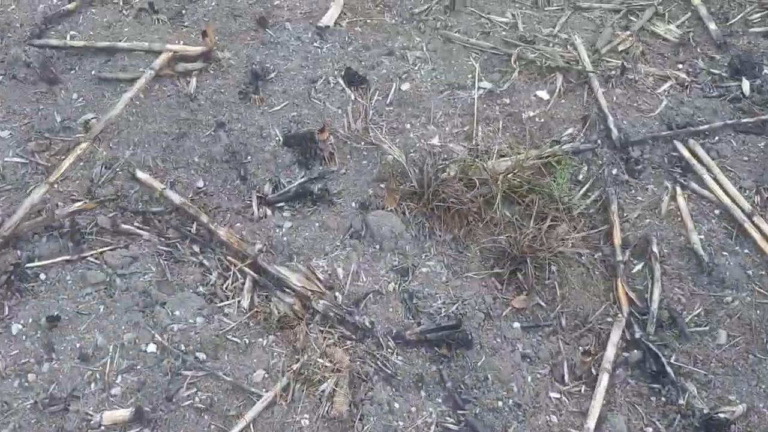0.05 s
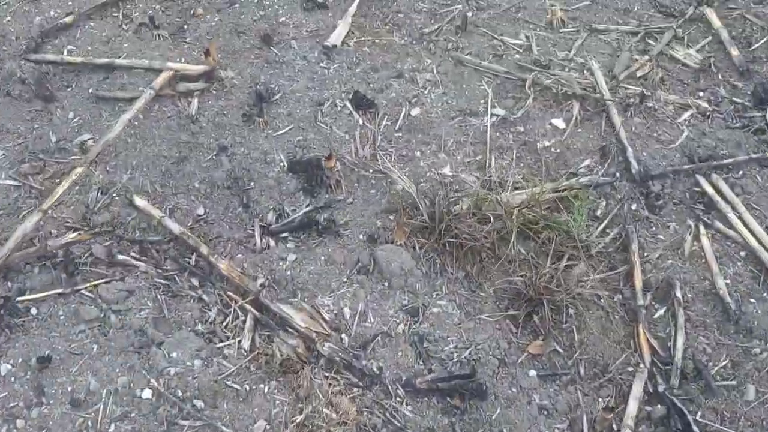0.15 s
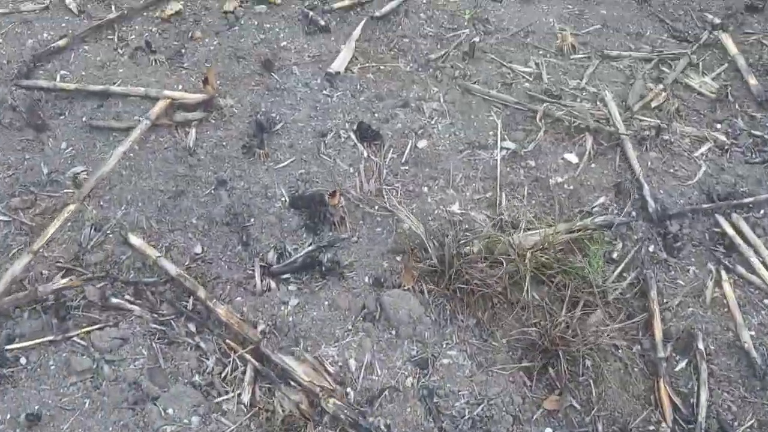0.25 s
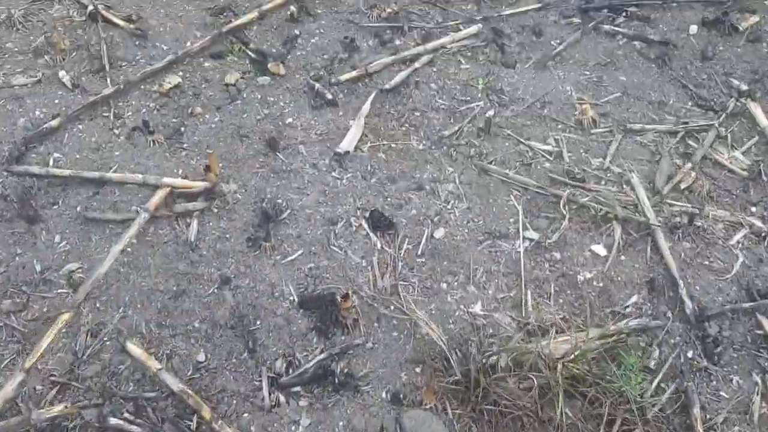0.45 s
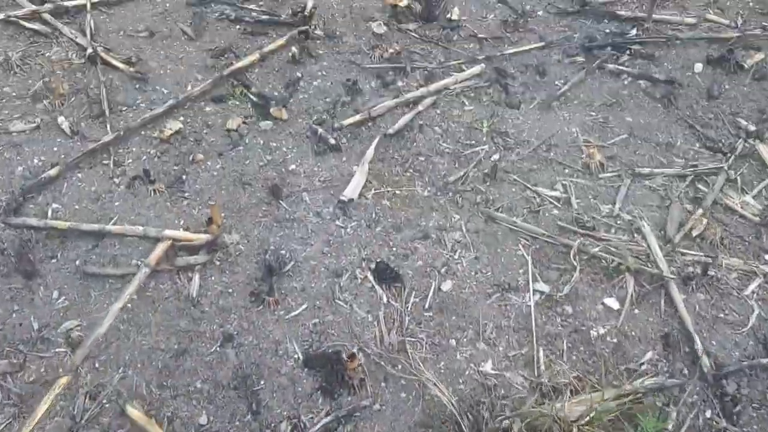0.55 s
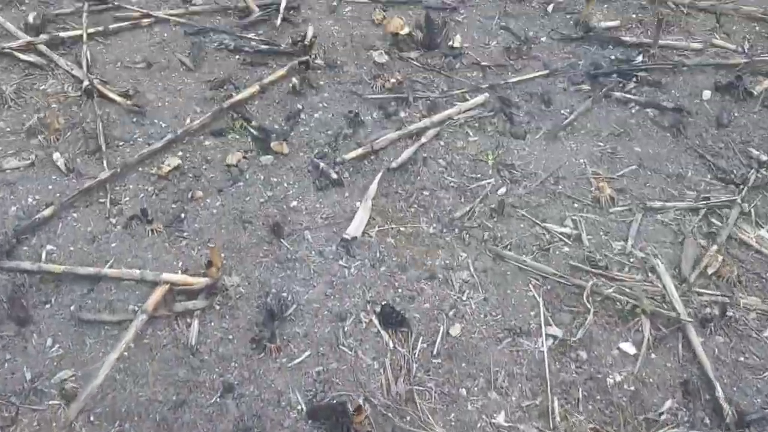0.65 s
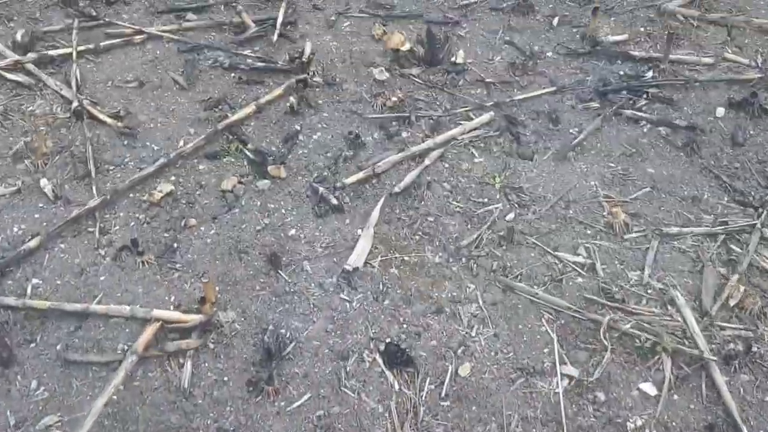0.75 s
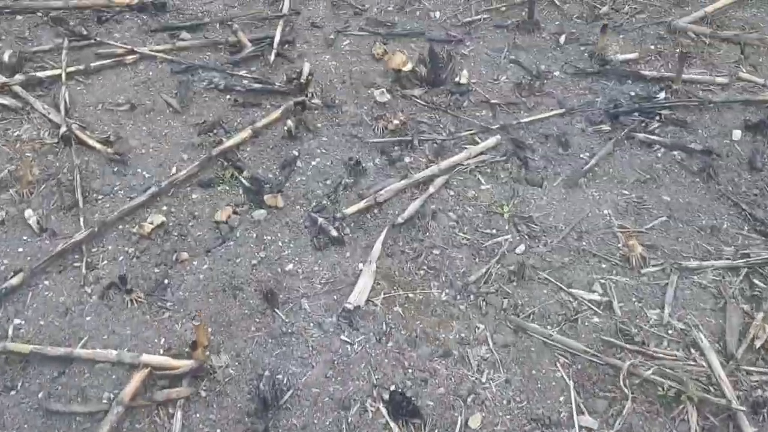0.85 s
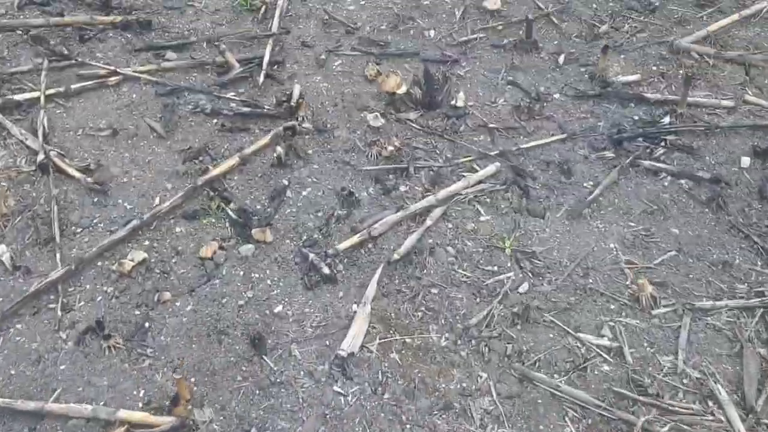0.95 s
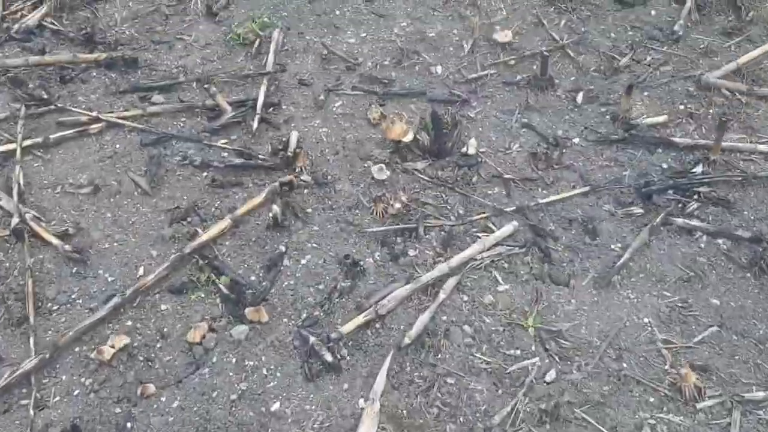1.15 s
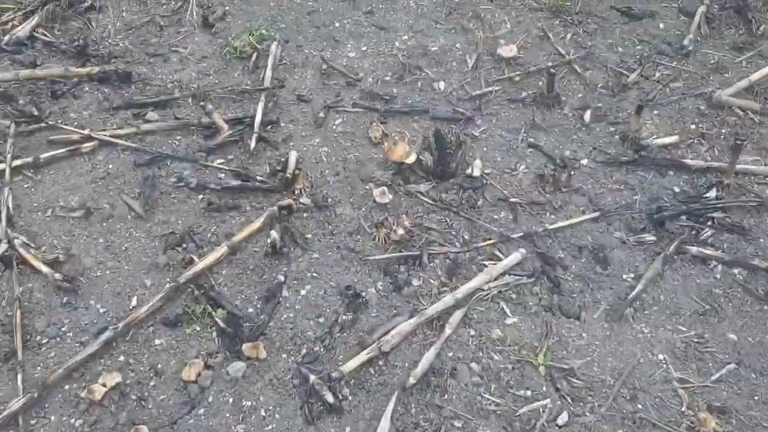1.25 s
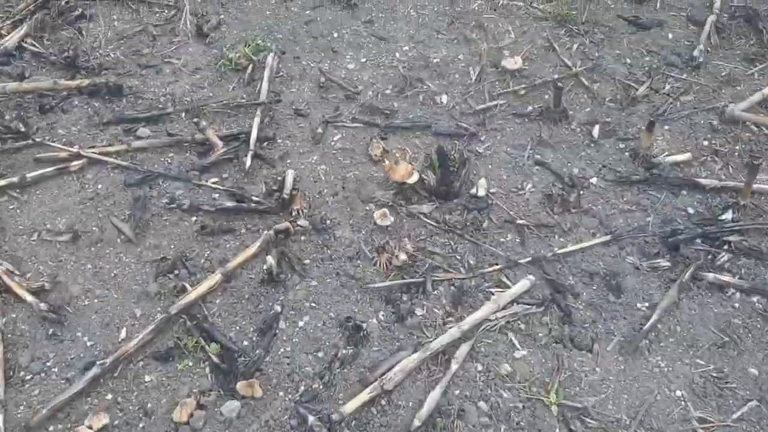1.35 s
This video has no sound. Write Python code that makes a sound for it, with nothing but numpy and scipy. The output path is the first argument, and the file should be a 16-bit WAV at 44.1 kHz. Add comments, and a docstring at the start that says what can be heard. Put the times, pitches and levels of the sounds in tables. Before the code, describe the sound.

Two slow footsteps crunch on dry stalks and gritty soil, close by. The first builds from the start to loud, sharp snaps at about 0.3 seconds, then dies away with soft thuds and knocks until 0.7. The second opens with a crisp snap at 0.8, crunches more lightly around 0.95 and fades by 1.3. A faint low rumble and very faint distant insects continue throughout.

```python
"""Two slow steps in a dry field

Each press of the foot crushes grit and straw in a shower of tiny fractures. Single stalks snap and ring
for about a millisecond, clods knock softly and the soil thuds under the weight. Insects trill far away
over a low rumble. The two ports of the microphone colour the sound differently."""
import sys
import numpy as np
from scipy import signal
from scipy.fft import rfft, irfft
from scipy.io import wavfile
from scipy.ndimage import uniform_filter1d, minimum_filter1d

SR = 44100
rng = np.random.default_rng(int(sys.argv[2]) if len(sys.argv) > 2 else 0)


def generate_wav(sig):
    """Save sig (samples, or channels by samples) to the path in sys.argv[1] as 16-bit PCM at SR."""
    pcm = np.round(np.clip(np.atleast_2d(sig).T, -1, 1) * 32767).astype(np.int16)
    wavfile.write(sys.argv[1], SR, pcm)


N = 61739


def amp(db):
    """Amplitude ratio of a level in decibels."""
    return 10 ** (np.asarray(db) / 20)


def unit(x):
    """Normalisation to an rms of 1."""
    return x / np.sqrt(np.mean(x ** 2) + 1e-20)


def add(mix, start_s, sound):
    """Superposition of a sound on the two-channel mix."""
    part = mix[:, max(round(start_s * SR), 0):][:, :sound.shape[-1]]
    part += sound[..., :part.shape[-1]]


def colour(x, points, size=4096):
    """Minimum-phase filtering along (frequency_hz, gain_db) points."""
    hz, db = np.transpose(points)
    log_hz = np.log(abs(np.fft.fftfreq(size, 1 / SR)) + 1)
    gain = amp(np.interp(log_hz, np.log(hz), db))
    response = np.exp(np.conj(signal.hilbert(np.log(gain))))
    taps = np.fft.ifft(response).real[:size // 2]
    return np.apply_along_axis(lambda v: signal.fftconvolve(v, taps)[:N], -1, x)


def sides(db):
    """Left and right gains for a level difference, left minus right."""
    return amp(np.array([[db], [-db]]) / 2)


def field():
    """Filtered noise: a fading rumble, partly coherent between the sides, and a thin hiss of open air."""
    # frequency_hz, gain_db
    rumble_spectrum = [(20, -29.5), (40, -12.5), (75, 4.5), (130, 0), (250, -12.5), (500, -20.5),
                       (1000, -36.5), (2500, -49), (8000, -52)]
    air_spectrum = [(200, -6.5), (1500, 1), (2500, -6.5), (3600, 5.5), (5000, 2.5), (6500, -13),
                    (8500, -22), (15000, -14)]
    rumble_db, air_db, fade_db = -49.5, -68, -7.5
    noise = rng.standard_normal(N) + 0.61 * rng.standard_normal((2, N))  # common + independent
    fading = amp(fade_db * np.linspace(-.5, .5, N))
    rumble = fading * unit(colour(noise, rumble_spectrum))
    air = unit(colour(rng.standard_normal((2, N)), air_spectrum))
    return amp(rumble_db) * rumble + amp(air_db) * air


def insects():
    """Amplitude modulation: a far chorus is a narrow band of noise pulsing at an uneven rate."""
    pitch_hz, width_hz, level_db = 5496, 300, -69.5
    trill_hz, trill_depth = 55, 0.46
    t = np.arange(N) / SR
    band = np.exp(-((np.fft.rfftfreq(N, 1 / SR) - pitch_hz) / width_hz) ** 2)
    drift = unit(uniform_filter1d(rng.standard_normal(N), SR // 30))
    trill = 1 + trill_depth * np.sin(2 * np.pi * trill_hz * (t + 0.32 * np.cumsum(drift) / SR))
    chorus = irfft(rfft(rng.standard_normal((2, N))) * band, N)
    return amp(level_db) * sides(db=4.5) * unit(chorus * trill)


def fractures(spectrum, per_s, spread_db, side_spread, spots=7):
    """Shot noise of tiny fractures; each spot under the foot has its own delay between the ports."""
    strength = amp(spread_db * np.minimum(rng.exponential(1, N), 4))
    left = strength * rng.choice([-1, 1], N) * (rng.random(N) < per_s / SR)
    spot = rng.integers(0, spots, N)
    right = sum(np.roll(left * (spot == k), k - spots // 3) for k in range(spots))
    side_gains = np.exp(side_spread * rng.standard_normal((2, N)))
    crackle = colour(np.array([left, right]) * side_gains, spectrum)
    running_power = abs(uniform_filter1d((crackle ** 2).mean(0), SR // 60))
    return crackle / np.sqrt(running_power + 1e-12)


def crunches():
    """Brittle crushing of grit, straw and splinters: presses swell, die away and add in power."""
    # peak_s, rise_s, fall_s, grit_db, straw_db, splinter_db
    presses = [(0.018, .025, 0.041, -54.5, -48, -59.5), (0.13, 0.04, 0.09, -54, -49, -58),
               (.167, 0.018, 0.019, -49.5, -44.5, -50.5), (.218, 0.019, 0.05, -38.5, -40, -44.5),
               (0.239, 0.0095, .012, -34, -34, -41.5), (0.303, 0.0025, 0.0067, -25, -46, -28),
               (0.325, 0.02, 0.019, -31, -33, -37), (0.382, 0.013, 0.035, -47, -51, -55.5),
               (0.423, 0.007, 0.014, -49, -50, -78), (.494, 0.032, 0.043, -53.5, -56.5, -59.5),
               (0.62, 0.034, 0.02, -58.5, -58.5, -78), (.66, 0.0043, 0.036, -63.5, -60.5, -77),
               (0.756, 0.0075, 0.022, -74, -58, -67), (0.796, 0.0085, .02, -47.5, -49, -49.5),
               (.856, 0.019, 0.04, -61, -59, -59), (0.901, 0.017, 0.06, -72, -55.5, -68),
               (.942, 0.015, 0.031, -41.5, -41, -50), (0.968, 0.01, 0.0084, -40.5, -44.5, -71),
               (1.039, 0.044, 0.044, -54.5, -60.5, -63), (1.126, 0.039, 0.024, -53.5, -53.5, -63.5),
               (1.168, .006, 0.019, -57.5, -62, -63), (1.276, 0.062, 0.039, -81, -63, -93),
               (1.4, 0.0061, .02, -85, -55, -83.5)]
    # frequency_hz, gain_db
    grit_spectrum = [(40, -21), (150, -10), (400, 3), (900, 4), (1700, -0.5), (2600, -0.5), (4000, -2.5),
                     (8000, -51.5)]
    straw_spectrum = [(300, -25), (1500, -12), (2800, 0), (4200, 14.5), (6400, -3.5), (8000, -14.5),
                      (11000, -8.5), (16000, -23.5)]
    splinter_spectrum = [(1000, -47), (5000, -6.5), (8000, -7), (12000, -3.5), (16000, -3.5)]
    t, power = np.arange(N) / SR, np.zeros((3, N))
    for peak_s, rise_s, fall_s, *levels_db in presses:
        age = t - peak_s
        press = np.exp(-np.where(age < 0, (age / rise_s) ** 2, age / fall_s))
        power += (amp(levels_db)[:, None] * press) ** 2
    grit, straw, splinters = np.sqrt(power)
    return (grit * fractures(grit_spectrum, per_s=3000, spread_db=3.5, side_spread=0.45)
            + straw * fractures(straw_spectrum, per_s=4500, spread_db=3.5, side_spread=0.5)
            + splinters * fractures(splinter_spectrum, per_s=6800, spread_db=4.5, side_spread=0.26))


def stalk_snaps():
    """Impulse excitation: a stalk breaks, tears and rings, and the litter scatters the sound back."""
    # start_s, level_db, pitch_hz, ring_ms, left_minus_right_db, edge_over_ring_db
    breaks = [(.1033, -21, 3960, 0.28, -5.5, -11), (0.1087, -37.5, 4340, 0.16, 16, 7),
              (.1154, -40, 5870, 0.21, 11, -24), (0.1532, -34.5, 5810, 0.37, 4, -7),
              (.1568, -25.5, 3850, .4, -7.5, -7), (0.1698, -34, 4700, 0.47, 8, -4),
              (.2024, -27.5, 4370, 0.4, -16, -1), (0.2161, -22.5, 4700, 0.12, -8, 6),
              (0.2275, -18, 2760, 0.11, 0, -10), (.2350, -18, 4050, .13, 3.5, 7.5),
              (.2391, -15.5, 2640, 0.053, -1, -4), (0.2454, -25, 4000, .3, -8, 9),
              (0.248, -21.5, 4400, .3, -8.5, -3), (.2588, -21, 4510, 0.23, 5.5, 2),
              (0.2769, -31.5, 4160, 0.11, 13.5, -1), (.2923, -14.5, 4600, 0.37, -7, -1.5),
              (0.3017, -1.5, 3970, 0.11, -5.5, 4), (.3037, -2.5, 4360, 0.35, 4, 6.5),
              (.3076, -12.5, 5540, 0.3, 15.5, -8.5), (.3129, -13, 4950, 0.28, 3.5, -7),
              (.323, -22, 4340, 0.38, -10, -10), (.3371, -18.5, 4830, 0.39, -7.5, 6),
              (0.3722, -32, 4200, .2, -5, 27), (0.3899, -35.5, 3900, 0.47, -7, -15),
              (.3923, -38.5, 6300, 0.11, 15, 27), (.4653, -29, 4520, 0.38, -3, -8.5),
              (.4992, -37.5, 4130, 0.35, -11.5, -10), (.5045, -47.5, 5000, 0.19, 12, 10),
              (0.5176, -34, 4800, 0.21, 5.5, 4), (.7897, -9, 5820, 0.11, 6.5, 1),
              (.7898, -11.5, 3200, 0.16, -1.5, -5), (.7909, -22.5, 3900, 0.63, 16.5, -11.5),
              (.8099, -28.5, 4320, 0.77, -3.5, -1.5), (.889, -44.5, 5650, 0.23, 13, 14),
              (0.9147, -44, 3870, 0.3, 12, -3), (0.9314, -35, 5000, .25, 2, 3),
              (.941, -30, 5900, 0.091, 9.5, 14), (0.9637, -34, 3930, 0.17, -6.5, -24),
              (0.9771, -32, 2950, 0.13, 0, -9), (1.0335, -46, 5500, 0.11, 7, 20),
              (1.119, -38.5, 4030, 0.55, -15.5, -22), (1.1253, -42.5, 4480, 0.57, -17.5, -20)]
    # hollow colour of the stalk: frequency_hz, gain_db
    stalk_body = [(100, -11.5), (700, -9.5), (1600, -4.5), (2600, 5.5), (5200, 2), (9000, -1), (16000, 6.5)]
    tear_s, tear_gain, boost_db = 0.0007, 0.8, 11
    scatter_s, scatter_db, right_lag_s = 0.0024, -14, 0.00003
    out, t = np.zeros((2, N)), np.arange(SR // 20) / SR
    lag = np.exp(-2j * np.pi * np.fft.rfftfreq(len(t), 1 / SR) * np.array([[0], [right_lag_s]]))
    taper = (1 - t / t[-1]) ** 2
    for start_s, level_db, pitch_hz, ring_ms, pan_db, edge_db in breaks:
        fibres, scatter = rng.standard_normal((2, 2, len(t)))
        age = t * 1000 / ring_ms
        ring = unit(np.sin(2 * np.pi * pitch_hz * t) * age * np.exp(-age))
        tear = tear_gain * fibres * np.exp(-t / tear_s)
        edge = colour((t == 0) + tear, stalk_body)[:, :len(t)]
        crack = unit(ring + amp(edge_db) * unit(edge))
        echo = unit(signal.fftconvolve(crack, scatter * np.exp(-t / scatter_s), axes=1)[:, :len(t)])
        snap = irfft(rfft(crack + amp(scatter_db) * echo) * lag, len(t)) * taper
        add(out, start_s, amp(level_db + boost_db) * sides(pan_db) * snap / np.sqrt(len(t)))
    return out


def knocks():
    """Heavily damped oscillation: clods and sole knock on the soil, each with a short crumble."""
    # start_s, level_db, pitch_hz
    impacts = [(.216, -26.5, 518), (.532, -39.5, 185), (.5985, -37.5, 408), (.608, -36, 440),
               (.6195, -32, 524), (.7203, -39, 497), (0.49, -54, 400), (1.186, -47, 430),
               (1.25, -43.5, 210)]
    # frequency_hz, gain_db
    crumble_spectrum = [(100, -11.5), (350, 5), (900, -4.5), (1500, -19), (4000, -38)]
    crumble_s, crumble_db = 0.01, -13.5
    out, t = np.zeros((2, N)), np.arange(SR // 15) / SR
    for start_s, level_db, pitch_hz in impacts:
        noise = unit(colour(rng.standard_normal(len(t)), crumble_spectrum)[:len(t)])
        crumble = amp(crumble_db) * noise * np.exp(-t / crumble_s)
        tone = np.sin(2 * np.pi * pitch_hz * t) * np.exp(-t * pitch_hz)  # falls to 1/e in one cycle
        add(out, start_s, amp(level_db) * (tone + crumble))
    return out


def thuds():
    """Compaction: soft swells of low noise as the soil gives way under the foot."""
    # peak_s, width_s, level_db
    pushes = [(0.276, 0.025, -44.5), (.35, 0.037, -45.5), (0.502, 0.06, -46), (0.959, 0.031, -50),
              (1.06, 0.091, -52), (1.16, 0.046, -54), (1.26, 0.075, -59.5)]
    # frequency_hz, gain_db
    soil_spectrum = [(30, -29.5), (70, -4), (170, 4.5), (300, -3), (480, -4), (800, -15.5), (2000, -43)]
    t = np.arange(N) / SR
    weight = sum(amp(db) * np.exp(-((t - peak_s) / width_s) ** 2) for peak_s, width_s, db in pushes)
    return weight * unit(colour(rng.standard_normal(N), soil_spectrum))


def scene():
    """Superposition of the footsteps and the sound of the field."""
    return stalk_snaps() + crunches() + thuds() + knocks() + insects() + field()


def record(dry):
    """Transduction: each port's frequency response, faint self-noise, a fast limiter and a band limit."""
    # frequency_hz, gain_db
    left_port = [(100, -18.5), (500, -11.5), (1000, -7.5), (2500, -3), (4500, -4), (6400, 9), (7500, 0.5),
                 (9000, -2.5), (11000, 2.5), (15500, -0.5)]
    right_port = [(100, -20.5), (500, -15), (1000, -12), (2200, -6.5), (3200, 1.5), (4700, -1), (5600, 5),
                  (6800, -3.5), (8300, -22), (10000, -16), (13000, -7), (15500, -29.5)]
    self_noise_db, ceiling, cutoff_hz = -79.5, 0.98, 16300
    x = np.array([colour(dry[0], left_port), colour(dry[1], right_port)])
    x += amp(self_noise_db) * rng.standard_normal((2, N))
    held_gain = minimum_filter1d(ceiling / np.maximum(abs(x), ceiling), size=41, axis=1)
    limited = x * uniform_filter1d(held_gain, size=41, axis=1)
    low_pass = signal.firwin(255, cutoff_hz, window=("kaiser", 8), fs=SR)
    return signal.oaconvolve(limited, low_pass[None], "same")


dry = scene()
out = record(dry)
generate_wav(out)
```